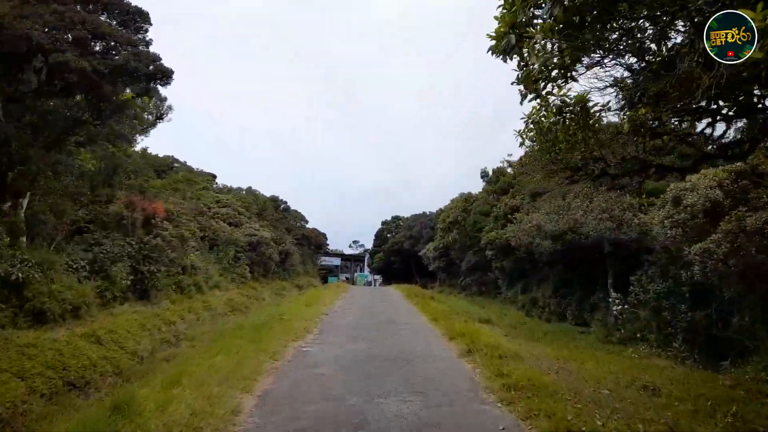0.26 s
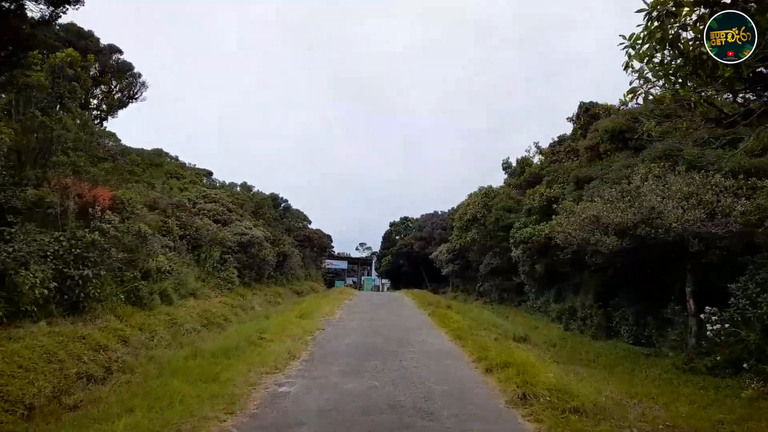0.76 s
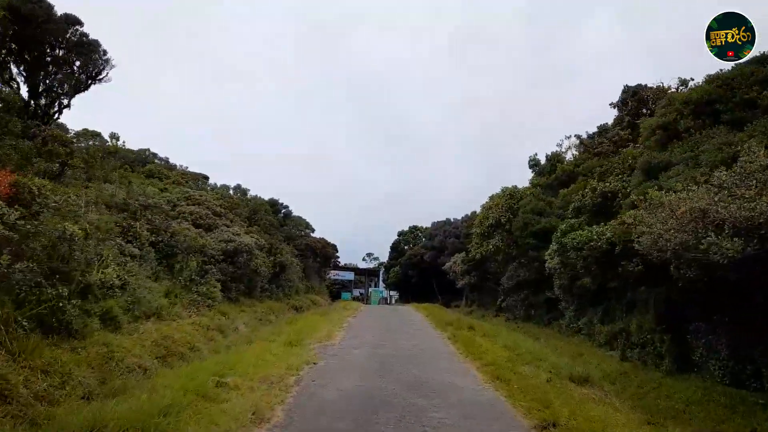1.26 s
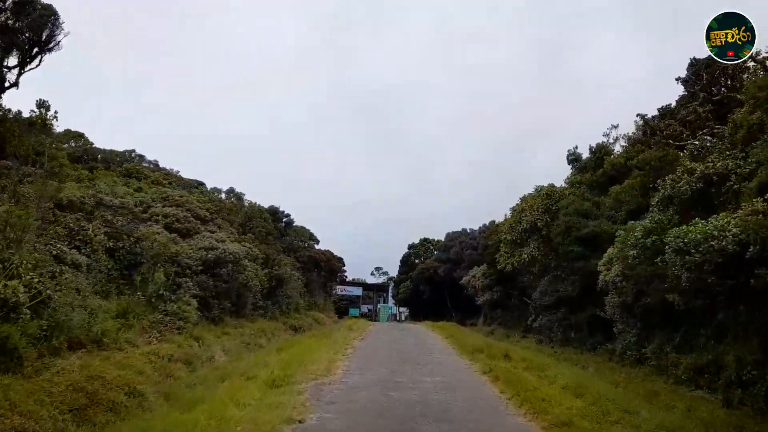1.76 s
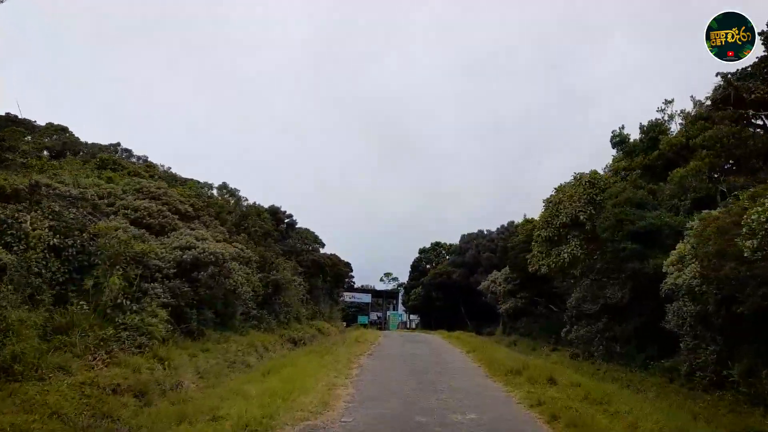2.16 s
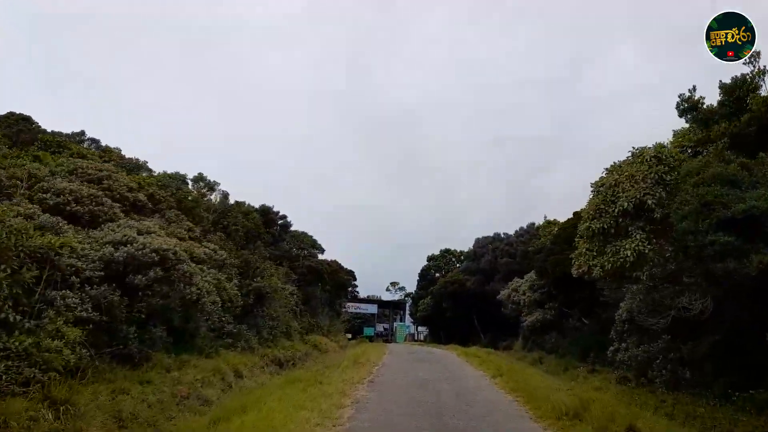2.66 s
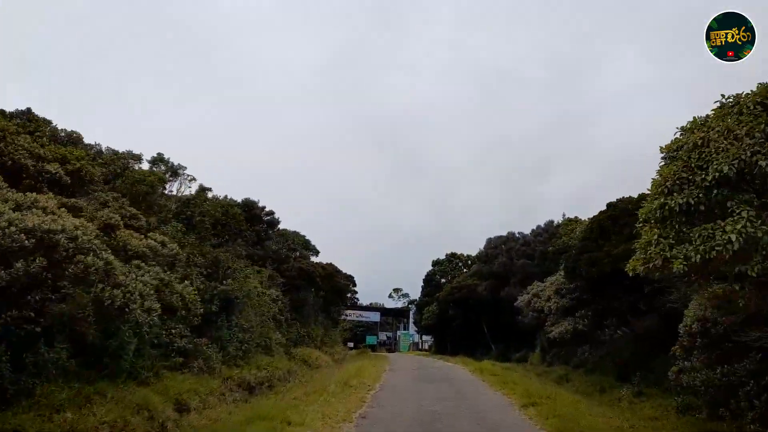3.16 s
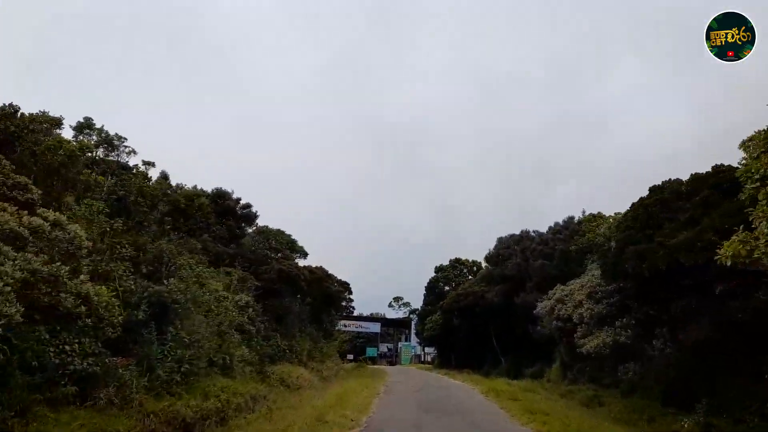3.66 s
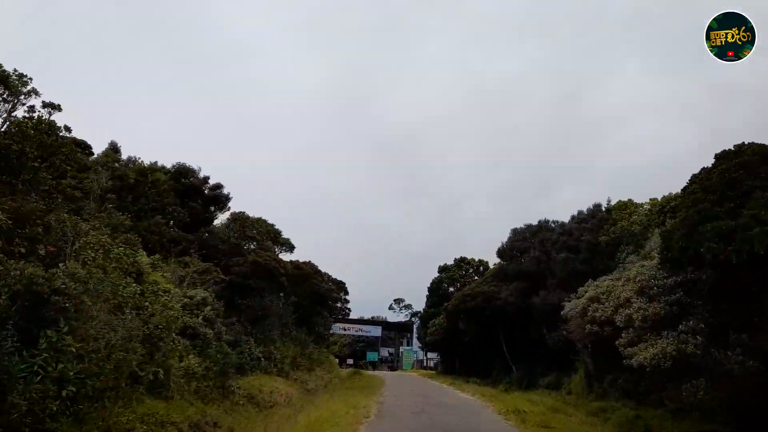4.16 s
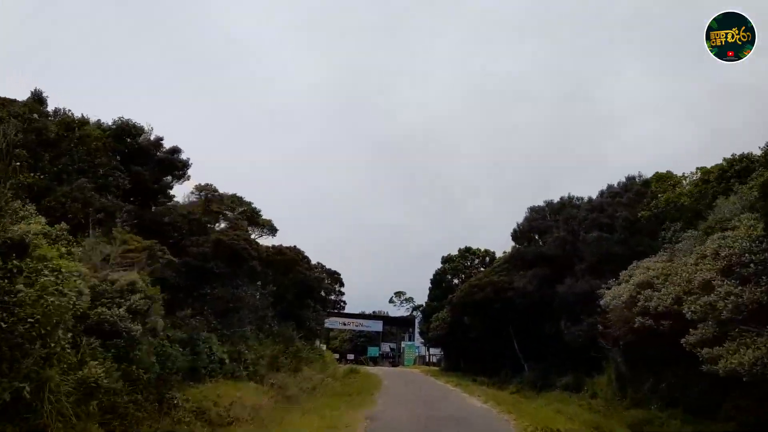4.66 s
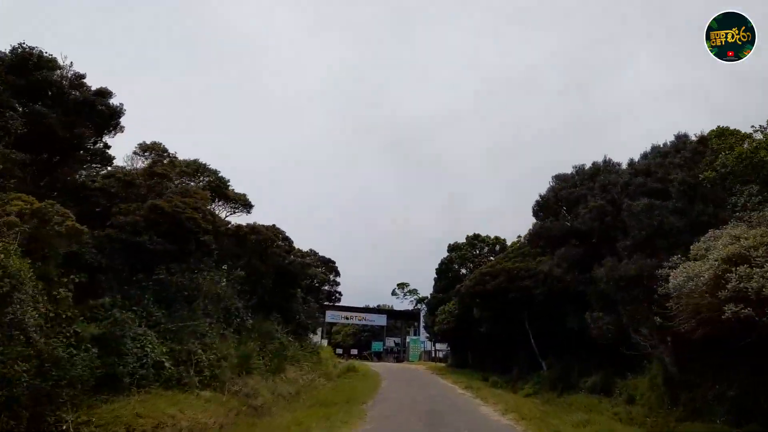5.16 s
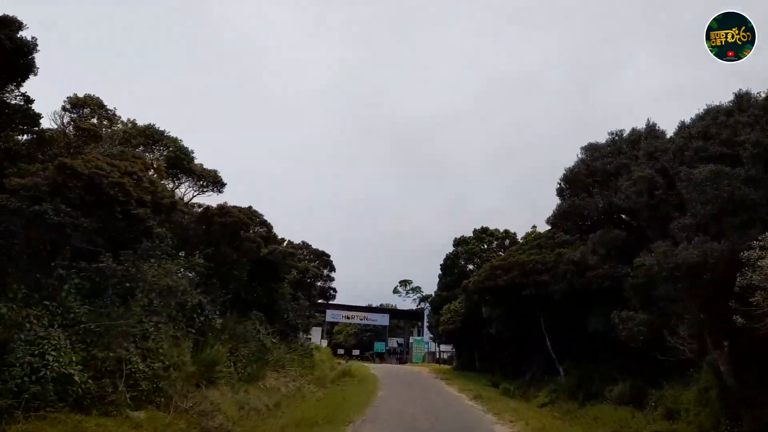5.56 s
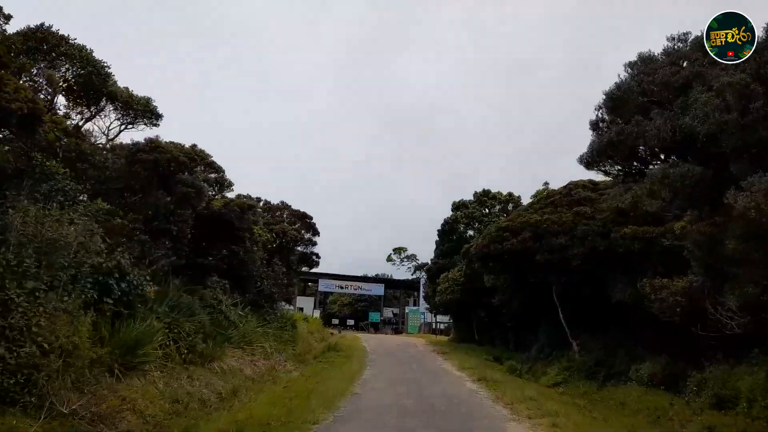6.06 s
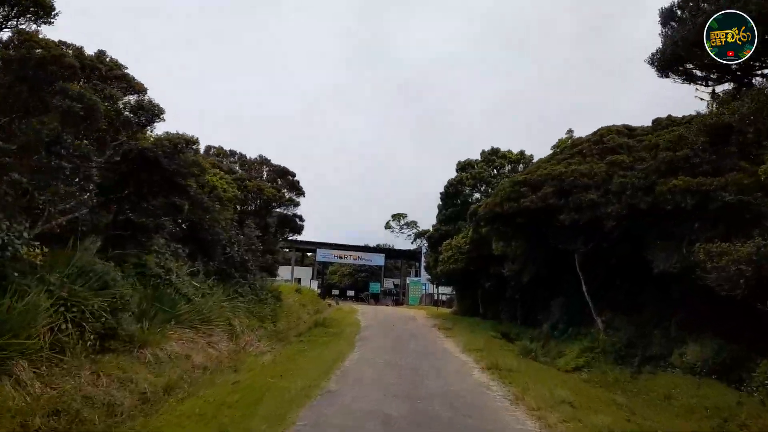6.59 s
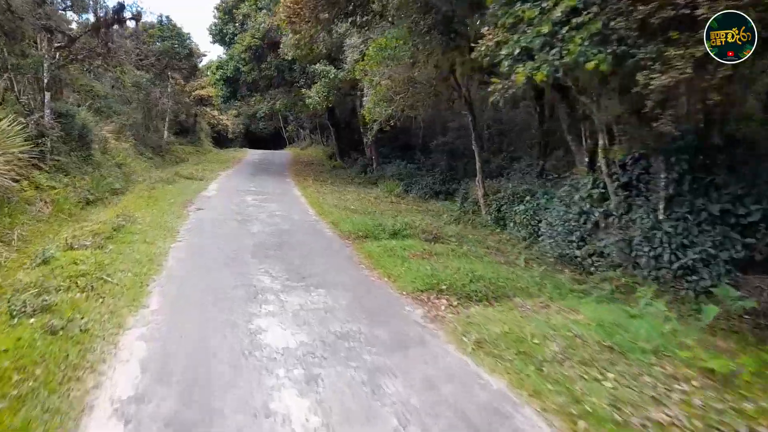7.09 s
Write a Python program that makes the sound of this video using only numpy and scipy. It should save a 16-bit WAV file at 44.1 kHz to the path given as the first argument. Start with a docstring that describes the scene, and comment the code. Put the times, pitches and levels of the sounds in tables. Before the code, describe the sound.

Riding a motorcycle in open air, microphone fixed to the bike. Loud, ragged wind buffets the right channel at first, over a steady engine hum and fast metallic chain chatter. Once the wind drops, rumble, panel thuds and small clacks stand out, with two soft gusts on the left. The engine slows with a brief whine and chain knocking, then picks up as loose clatter and hiss grow at the end.

```python
"""On board a single-cylinder motorcycle on a rough lane: exhaust harmonics hum, gears whine, the drive chain
slaps its guard; bumps shake the bodywork, a loose part clacks, tyres and passing air rumble and hiss as noise.
For the first two seconds wind buffets the right microphone port; two later gusts thump mostly the left.
After five seconds the throttle eases: the revs sag, the gear whine flares and the chain knocks the casing.
The revs then pick up again, and the loose part clacks hardest close to the end."""
import sys
import numpy as np
from scipy import signal
from scipy.fft import rfft, irfft, next_fast_len
from scipy.io import wavfile
from scipy.ndimage import map_coordinates

SR = 44100
rng = np.random.default_rng(int(sys.argv[2]) if len(sys.argv) > 2 else 0)


def unload_audio(sound):
    """Save the sound as a 16-bit wav file, at the path given as the first command line argument."""
    columns = np.transpose(np.atleast_2d(sound))
    # keep every value between -1 and 1, then stretch to whole-number steps
    steps = np.round(np.clip(columns, -1, 1) * 32767)
    wavfile.write(sys.argv[1], SR, steps.astype(np.int16))


N = 323341

# The rider's hand. Each row: time in seconds, throttle opening from 0 to 1.
THROTTLE_OPENING = [(0, 1), (5.2, .85), (5.6, .03), (6.6, .05), (6.9, .3), (7.33, .5)]
# The lane's surface. Each row: time in seconds, shaking of the bodywork in dB, rumble under full throttle in dB.
LANE_SURFACE = [(0, -34, -32), (2, -35.5, -35.5), (3.1, -35, -39), (3.8, -29, -37), (4.5, -34.5, -35),
                (5, -29.5, -32.5), (5.9, -36.5, -32.5), (6.7, -37.5, -31), (7.33, -25, -40)]
# Ringing of the chain guard. Each row: frequency in Hz, level in dB, t60 in seconds.
GUARD_MODES = [(1305, -4.5, 0.028), (1840, -0.5, 0.013), (2493, 1.5, 0.0074), (3260, -3, 0.013),
               (4120, -5, 0.0082), (4640, -2, 0.0083), (6450, -6, 0.0037), (7400, -8.5, 0.0055),
               (10500, -4.5, 0.0021)]
# Sound from the bike's hard contacts reaches the left port first.
PORT_LAG_S = .00018


def amp(db):
    """Decibels to gain."""
    return 10 ** (np.asarray(db) / 20)


def unit(x):
    """Scale to rms 1."""
    return x / np.sqrt(np.mean(x ** 2) + 1e-20)


def along(points, hz):
    """Read a curve of (Hz, value) points on a log frequency axis."""
    f, v = np.transpose(points)
    return np.interp(np.log(hz + 1), np.log(f + 1), v)


def curves(rows):
    """One value per sample for each column after the time."""
    s, *cols = np.transpose(rows)
    return [np.interp(np.arange(N) / SR, s, c) for c in cols]


def wobble(rate):
    """A smooth random curve with rate knots a second."""
    knots = rng.standard_normal(int(N * rate / SR) + 4)
    return map_coordinates(knots, [np.arange(N) * rate / SR])


def filtered(x, response):
    """x through a response given as a function of frequency in Hz."""
    m = next_fast_len(N + SR // 2)
    return irfft(rfft(x, m) * response(np.fft.rfftfreq(m, 1 / SR)), m)[..., :N]


def ring(x, modes):
    """x through parallel (Hz, width Hz, dB) resonances of alternating sign."""
    def response(f):
        total = 0
        for k, (centre, width, db) in enumerate(modes):
            damping = 1j * f * width
            total = total + (-1) ** k * amp(db) * damping / (centre * centre - f * f + damping)
        return total
    return filtered(x, response)


def noise(spectrum):
    """Coloured noise of rms 1."""
    return unit(filtered(rng.standard_normal(N), lambda hz: amp(along(spectrum, hz))))


def spread(pair, spectrum):
    """Colour two unrelated signals and mix them into a left and right of rms 1 that are partly alike."""
    # Likeness of the two ports. Each row: frequency in Hz, left-right correlation from -1 to 1.
    likeness = [(60, 0.54), (300, 0.72), (700, 0.61), (1400, 0.21), (3000, 0.3), (6000, -0.099)]

    def response(hz):
        turn = np.arccos(np.clip(along(likeness, hz), -1, 1)) / 2
        return amp(along(spectrum, hz)) * np.array([np.cos(turn), np.sin(turn)])
    mid, side = filtered(pair, response)
    return unit(np.array([mid + side, mid - side]))


def impulses(times, sizes):
    """One sharp blow at each time."""
    places = np.clip(np.round(times * SR).astype(int), 0, N)
    return np.bincount(places, sizes, N + 1)[:N]


def swell(s, length):
    """A bell-shaped rise and fall around time s; length is its standard deviation in seconds."""
    return np.exp(-.5 * ((np.arange(N) / SR - s) / length) ** 2)


def strikes(times, db, modes):
    """Left and right ring of (Hz, dB, t60) modes; each blow lands elsewhere and so has its own colour."""
    hz, level, t60 = np.transpose(modes)[..., None]
    t = np.arange(SR // 24) / SR
    age = np.maximum(t - np.array([0, PORT_LAG_S])[:, None, None], 0)
    attack = 1 - np.exp(-2 * hz * age)
    out = np.zeros((2, N + len(t)))
    for s, blow_db in zip(times, db):
        size, detune, phase, apart = rng.standard_normal((4, len(modes), 1))
        turn = np.pi * phase + .5 * np.array([apart, -apart])
        decay = amp(blow_db + level + 2.3 * size - 60 * age / t60)
        tones = decay * np.sin(2 * np.pi * hz * (1 + .025 * detune) * age + turn)
        start = max(round(s * SR), 0)
        out[:, start:start + len(t)] += np.sum(tones * attack, axis=1)
    return out[:, :N]


def hiss():
    """Tyres and passing air hiss: coloured noise with a fine, random grain."""
    # Colour of the hiss. Each row: frequency in Hz, level in dB per Hz.
    hiss_colour = [(300, 12.5), (1200, 14), (2200, 7), (3700, 5.5), (4600, 5), (6000, 0.5), (7400, -1),
                   (8500, -3), (10100, 8.5), (11300, 0), (13500, 4), (15800, -16)]
    # Each row: time in seconds, hiss level in dB midway between the ports.
    hiss_level = [(0, -44), (1, -45), (1.6, -47), (2.6, -52.5), (4, -47.5), (5.4, -44.5), (6.2, -47),
                  (6.9, -45), (7.33, -38.5)]
    grain = amp(2.9 * wobble(300) + 1.5 * wobble(22))
    air = spread(grain * rng.standard_normal((2, N)), hiss_colour)
    return amp(curves(hiss_level)[0]) * air * amp([[.7], [-.7]])  # a little stronger on the left


def rumble():
    """Tyres and casing drone as low noise with a coarse grain, less so off the throttle."""
    # Colour of tyres and engine casing. Each row: frequency in Hz, level in dB per Hz.
    rumble_colour = [(25, -3), (55, 1.5), (110, -2), (280, 1), (420, -6.5), (600, -4), (850, -15),
                     (1080, -7.5), (1250, -25.5), (1550, -31), (3000, -63)]
    grain = amp(3 * wobble(170))
    eased_db = -4 * (1 - np.clip(curves(THROTTLE_OPENING)[0], 0, 1))
    drone = spread(grain * rng.standard_normal((2, N)), rumble_colour)
    return amp(curves(LANE_SURFACE)[1] + eased_db) * drone


def wind():
    """Eddies thump the microphone ports as low noise; on the right they also tear into a harsher flutter."""
    # Gusts on the ports. Each row: centre in seconds, length in seconds, left thump in dB,
    # right thump in dB, right flutter in dB.
    gusts = [(.02, 0.0067, -49, -22, -18), (0.169, 0.0088, -45, -13.5, -39), (0.278, 0.021, -43, -11, -28),
             (0.397, 0.034, -45, -10.5, -22), (0.502, 0.0073, -47, -10, -17.5),
             (0.727, 0.018, -47, -14.5, -18), (0.829, 0.027, -49, -15, -28),
             (1.036, 0.042, -45, -13.5, -31), (1.16, 0.036, -46, -14.5, -19.5),
             (1.212, .005, -44, -16, -18), (1.274, 0.0055, -19, -13, -21), (1.362, 0.0059, -38, -29, -19),
             (1.49, 0.052, -46, -13.5, -20.5), (1.584, 0.0077, -47, -25, -19.5),
             (1.673, 0.01, -47, -34, -13.5), (1.731, 0.018, -47, -13.5, -23), (1.808, 0.0036, -45, -5, -13),
             (1.821, 0.0027, -47, -8, -15), (1.865, 0.0099, -43, -12, -13),
             (1.942, 0.0091, -45, -11.5, -17.5), (3.433, 0.088, -26, -39.5, -41),
             (4.965, 0.049, -27, -39, -52)]
    # Colour of the thumps. Each row: frequency in Hz, level in dB per Hz.
    thump_colour = [(18, -45), (30, -33), (45, -5), (70, -4), (130, 3), (200, 0.5), (300, -3.5),
                    (420, -15.5), (800, -49), (2000, -89)]
    # Colour of the torn air. Each row: frequency in Hz, level in dB per Hz.
    flutter_colour = [(120, -4.5), (300, 1.5), (550, -1.5), (800, -10.5), (1300, -24.5), (2500, -50),
                      (8000, -54)]
    # The steady stream. Each row: time in seconds, flutter relative to its thumps in dB.
    harshness = [(0, -22), (.9, -12), (1.1, -6), (1.9, -10)]
    # Steady air hits the right port until the port is sheltered.
    stream_db, shelter_s, shelter_fade_s = -19, 1.965, .026
    exposed = np.clip(1 - (np.arange(N) / SR - shelter_s) / shelter_fade_s, 0, 1)
    stream = exposed * amp(stream_db)
    left, right, torn = sum(amp(levels)[:, None] * swell(s, length) for s, length, *levels in gusts)
    eddies = wobble(90)  # thumps and flutter share these
    thumps = unit(amp(2.4 * eddies) * noise(thump_colour))
    flutter = unit(amp(1.5 * eddies + 2.6 * wobble(200)) * noise(flutter_colour))
    right_thumps = np.hypot(stream, right) * thumps
    right_flutter = np.hypot(stream * amp(curves(harshness)[0]), torn) * flutter
    return np.array([left * noise(thump_colour), right_thumps + right_flutter])


def grit():
    """Grit from the tyres ticks against the chain guard at random."""
    when, force = rng.random((260, 2)).T
    ticks = strikes(when * N / SR, 10 * force, GUARD_MODES)
    return amp(-55) * unit(ticks)


def contacts(blows):
    """Each hard contact is a click and a short scrape; it reaches the left port first."""
    t60_s, click = .011, 3.5  # click: its size beside the scrape
    t = np.arange(SR // 6) / SR
    tail = amp(-19 - 60 * t / .09)
    decay = (amp(-60 * t / t60_s) + tail) * (1 - np.exp(-t / .00015))
    scrape = signal.fftconvolve(blows, decay)[:N]
    shared = scrape * rng.standard_normal(N) + click * blows
    lagged = np.roll(shared, round(PORT_LAG_S * SR))
    return np.array([shared, lagged]) + scrape * rng.standard_normal((2, N))


def clacks():
    """A loose part hits its stop: short contacts excite its broad resonances, and it rings on briefly."""
    # Hits of the loose part. Each row: time in seconds, strength in dB.
    hits = [(.343, -29), (0.635, -31), (0.765, -32.5), (1.1002, -27), (1.146, -27.5), (2.0451, -29.5),
            (2.5654, -27.5), (2.613, -30), (2.964, -27), (3.008, -31.5), (3.157, -36), (3.235, -31),
            (3.649, -31), (3.7675, -27.5), (4.3948, -34), (4.6357, -31.5), (4.8056, -29), (4.8732, -33),
            (5.3115, -32), (5.5758, -30.5), (5.69, -33), (6.827, -22.5), (6.938, -32), (7.0618, -29.5),
            (7.1048, -19.5), (7.1435, -24.5), (7.22, -20), (7.263, -27), (7.31, -33.5)]
    # Resonances of the loose part. Each row: frequency in Hz, width in Hz, level in dB.
    loose_part = [(336, 160, 20.5), (750, 1000, 7), (1530, 69, 10), (2780, 480, 8.5), (4700, 2100, 2.5),
                  (6170, 790, 5), (7760, 1400, 5.5), (10100, 1400, 3), (11880, 710, 6), (13200, 2500, 2)]
    # Its ringing on. Each row: frequency in Hz, level in dB, t60 in seconds.
    after_ring = [(620, -3, .04), (1380, -5, .04), (1900, -9, .025), (2950, -8, .03), (5000, -17, .03)]
    times, db = np.transpose(hits)
    knocking = ring(contacts(impulses(times, amp(db))), loose_part)
    return (knocking + strikes(times, db, after_ring)) * amp([[.8], [-.8]])  # a little nearer the left


def jolt(s):
    """The envelope of one blow to the bodywork at time s: a fast rise that dies away."""
    attack_s, t60_s = .00028, .3
    age = np.maximum(np.arange(N) / SR - s, 0)
    return amp(-60 * age / t60_s) * (1 - np.exp(-age / attack_s))


def bodywork():
    """The road shakes the panels as noise in uneven spurts; each bump sets them drumming with a thud."""
    # Colour of the panels. Each row: frequency in Hz, level in dB per Hz.
    panel_colour = [(25, -41), (60, -19), (120, -8.5), (210, -9), (275, -3.5), (325, 1), (405, -7),
                    (480, -5.5), (570, -14.5), (720, -12), (850, -14.5), (1050, -14), (1400, -27.5),
                    (4000, -41)]
    # Bumps in the lane. Each row: time in seconds, strength in dB.
    lane_bumps = [(1.09, -26), (2.207, -28), (2.552, -25), (2.795, -32), (2.957, -22.5), (3.204, -24),
                  (3.653, -32), (3.831, -23.5), (4.111, -23.5), (4.323, -22.5), (4.629, -26.5),
                  (4.794, -22.5), (4.911, -27), (5.26, -25), (6.241, -27), (6.771, -22), (6.818, -36),
                  (7.094, -21)]
    # The panels' thud. Each row: frequency in Hz, level in dB, t60 in seconds.
    panel_thud = [(330, 4, .055)]
    # After each bump the bike rebounds once, more weakly.
    rebound_s, rebound_loss_db = .046, 3
    shake = amp(curves(LANE_SURFACE)[0])
    spurts = amp(1.2 * wobble(30) + 2.8 * wobble(130))
    jolts = 0
    for s, db in lane_bumps:
        rebound = amp(-rebound_loss_db) * jolt(s + rebound_s)
        jolts = jolts + amp(db) * np.hypot(jolt(s), rebound)
    panels = spread(spurts * rng.standard_normal((2, N)), panel_colour)
    return np.hypot(shake, jolts) * panels + strikes(*np.transpose(lane_bumps), panel_thud)


def chain():
    """The slack chain slaps its guard and rattles small fittings; off the throttle it knocks the casing too."""
    # Each row: time in seconds, chain slaps a second.
    slap_rate = [(0, 49.26), (1, 50.35), (2.8, 52.11), (3.9, 48.29), (4.8, 47.5), (5.5, 48.03),
                 (5.9, 48.77), (6.4, 44.72), (6.75, 45.47), (7.33, 42.12)]
    # Each row: time in seconds, level of the slaps on the guard in dB.
    slap_level = [(0, -46), (.7, -48), (1.4, -50.5), (2.7, -53.5), (3.7, -47.5), (4.4, -45.5), (4.75, -41),
                  (5.05, -48.5), (5.3, -44), (5.9, -44.5), (6.6, -46.5), (7.33, -45)]
    # Small fittings that chatter. Each row: frequency in Hz, level in dB, t60 in seconds.
    fitting_modes = [(733, 6.5, 0.052), (1275, -10, .025), (1530, 0.5, 0.031), (1974, -3.5, 0.018),
                     (2344, 0.5, 0.021)]
    # Each row: time in seconds, level of the chatter in dB.
    chatter_level = [(0, -53), (3, -63), (4.3, -50.5), (4.75, -38.5), (5.1, -49), (5.3, -44.5),
                     (6.5, -57.5), (7.33, -46)]
    # Ring of the engine casing. Each row: frequency in Hz, level in dB, t60 in seconds.
    casing_modes = [(680, 0, .03)]
    # The slaps scatter in time and size, and every second one is harder.
    jitter_s, scatter_db, hard_db = .0004, 1.7, 6.5
    # The chain bounces once straight after each slap; the gap varies.
    bounce_s, bounce_loss_db = .0024, 5
    # The casing's knock under load and with the throttle closed.
    loaded_db, coasting_db = -57, -36
    slap_count = np.floor(np.cumsum(curves(slap_rate)[0]) / SR)
    times = np.flatnonzero(np.diff(slap_count))[:-1] / SR
    late, size, flight = rng.standard_normal((len(times), 3)).T
    times = times + jitter_s * late
    db = scatter_db * size + hard_db * (np.arange(len(times)) % 2)
    bounces = times + bounce_s * amp(2 * flight)
    first = strikes(times, db, GUARD_MODES)
    slaps = unit(first + strikes(bounces, db - bounce_loss_db, GUARD_MODES))
    chatter = unit(strikes(bounces, db, fitting_modes))
    slack = 1 - np.clip(curves(THROTTLE_OPENING)[0], 0, 1)
    knock_gain = amp((1 - slack) * loaded_db + slack * coasting_db)
    knocks = knock_gain * unit(strikes(times, db / 2, casing_modes))
    return amp(curves(slap_level)[0]) * slaps + amp(curves(chatter_level)[0]) * chatter + knocks


def harmonics(table, phase):
    """Wavering multiples of the cycle rate at rms 1, balanced by the throttle."""
    throttle = np.clip(curves(THROTTLE_OPENING)[0], 0, 1)
    total = 0
    for k, on_db, off_db in table:
        level = throttle * on_db + (1 - throttle) * off_db + 1.5 * wobble(12)
        total = total + amp(level) * np.sin(round(k) * phase)
    return unit(total)


def engine():
    """The exhaust hums on multiples of the cycle rate; the gear mesh whines at high multiples of it."""
    # Each row: time in seconds, engine cycles a second before a slight random waver.
    cycle_rate = [(0, 30.5), (.9, 31.1), (2.3, 31.3), (3.3, 30.7), (4.35, 29.9), (5.22, 29.7), (5.42, 28.5),
                  (5.58, 27.1), (5.85, 25.9), (6.25, 26.4), (6.7, 27.3), (7.33, 28.9)]
    # Each row: multiple of the cycle rate, level under throttle in dB, level with it closed in dB.
    exhaust_harmonics = [(2, 0.5, -7), (3, -6, -30), (4, -5.5, -2.5), (5, 0.5, -0.5), (6, -9, -1.5),
                         (7, -19, -12), (8, 1.5, -6.5)]
    # Each row: time in seconds, exhaust level in dB before the left-right balance.
    exhaust_level = [(0, -31.5), (1.7, -35.5), (3, -38.5), (4.1, -35), (5.2, -34.5), (6.2, -34),
                     (6.7, -36.5), (7.33, -39.5)]
    # Gear mesh and its sidebands. Each row: multiple of the cycle rate, dB under throttle, dB with it closed.
    mesh_harmonics = [(31, -3, -15), (34, 0, 0), (35, -3, -1)]
    # The whine flares as the load comes off the teeth. Each row: time in seconds, level in dB.
    whine_level = [(0, -50), (5.27, -51), (5.39, -38), (5.52, -46.5), (6.3, -45), (7, -46.5), (7.33, -42)]
    rate = curves(cycle_rate)[0] * (1 + .002 * wobble(14))
    phase = 2 * np.pi * np.cumsum(rate) / SR
    mesh = harmonics(mesh_harmonics, phase + .012 * wobble(45))
    balance = amp([[.3], [-2]])  # left, right
    hum = amp(curves(exhaust_level)[0]) * harmonics(exhaust_harmonics, phase) * balance
    return hum + amp(curves(whine_level)[0]) * mesh


def thin_right(x):
    """The bass on the right comes and goes: it is turned down except in a few stretches."""
    # Stretches of full bass. Each row: start in seconds, end in seconds.
    full_bass = [(0, 2.4), (3.65, 4.5), (5.83, 6.17), (6.38, 6.5), (6.85, 7.1)]
    edge_hz, thin_db, fade_s = 244, -18, .055
    bass = filtered(x[1], lambda hz: 1 / (1 + (hz / edge_hz) ** 8))
    t = np.arange(N) / SR
    full = sum(np.clip(.5 + np.minimum(t - start, end - t) / fade_s, 0, 1) for start, end in full_bass)
    kept = np.clip(full, amp(thin_db), 1)
    return np.array([x[0], x[1] - (1 - kept) * bass])


def scene():
    """Everything rides along with the microphone, in the open air."""
    background = hiss() + wind() + grit()
    bike = thin_right(rumble() + bodywork() + engine())
    return background + clacks() + chain() + bike


def record(dry):
    """The recorder rounds off the biggest peaks, rolls off the deepest bass and cuts the top sharply."""
    low_cut_hz, top_hz = 32, 15900
    rounded = dry / (1 + (dry / .8) ** 6) ** (1 / 6)
    return filtered(rounded, lambda hz: (hz < top_hz) * (1 - 1 / (1 + (hz / low_cut_hz) ** 6)))


dry = scene()
out = record(dry)
unload_audio(out)
```